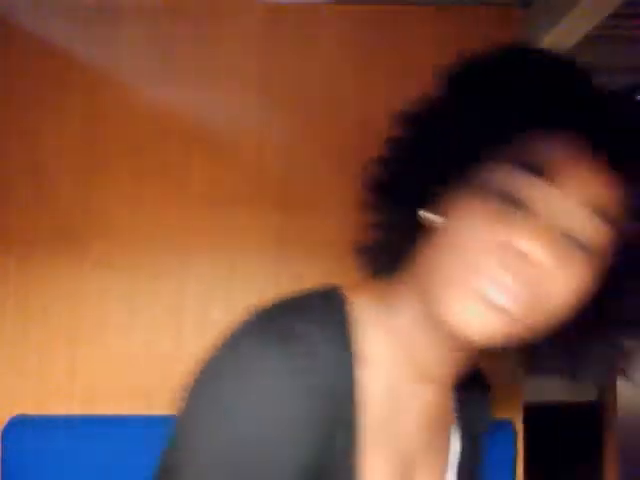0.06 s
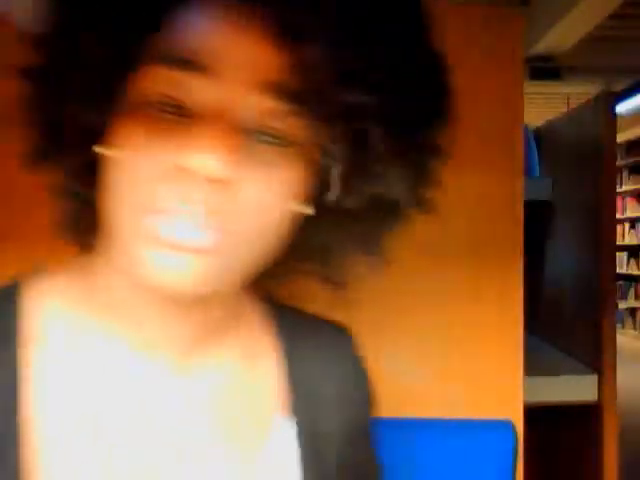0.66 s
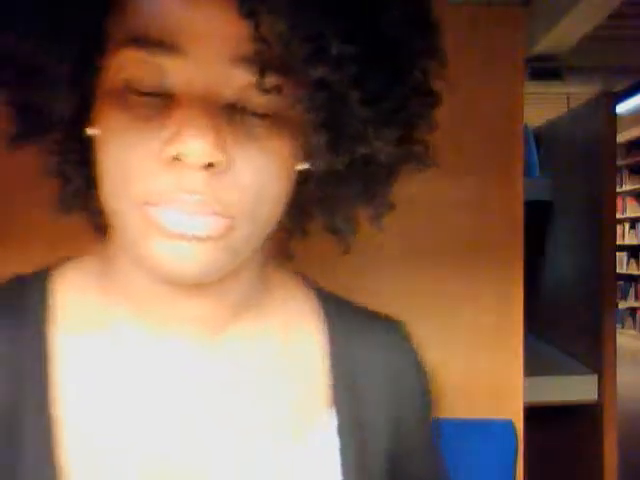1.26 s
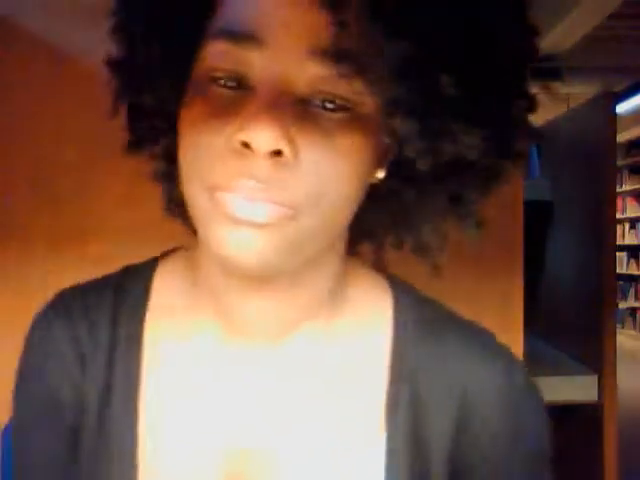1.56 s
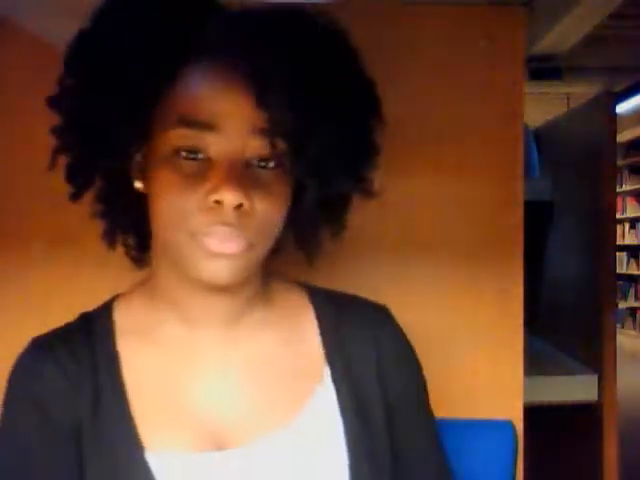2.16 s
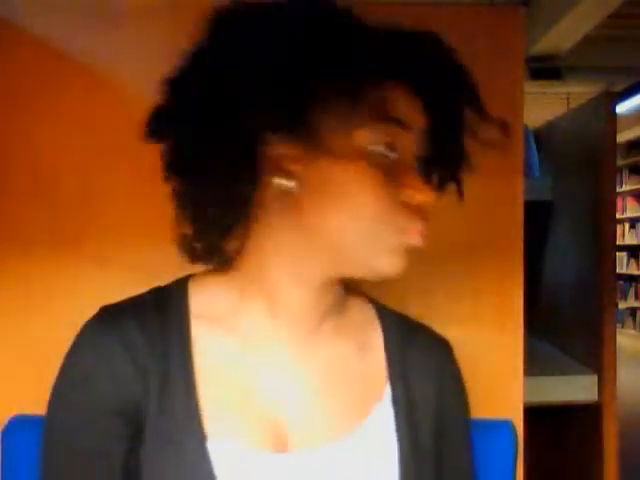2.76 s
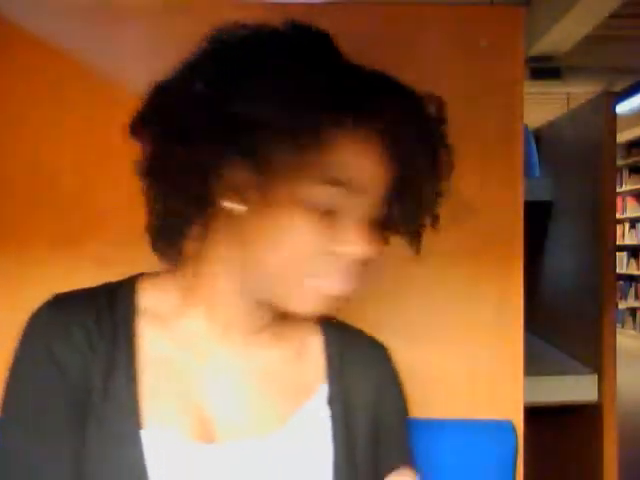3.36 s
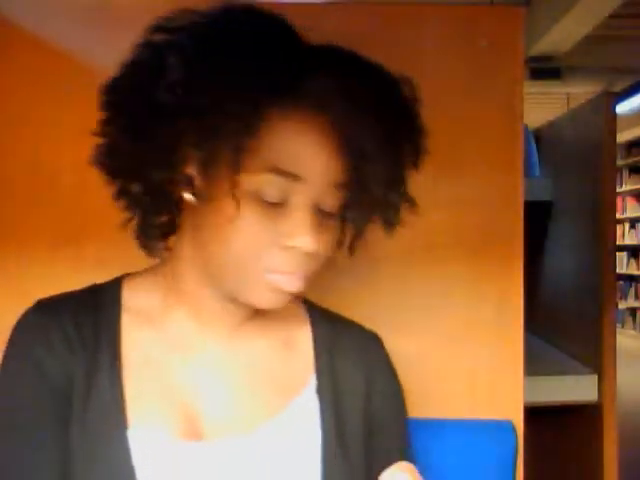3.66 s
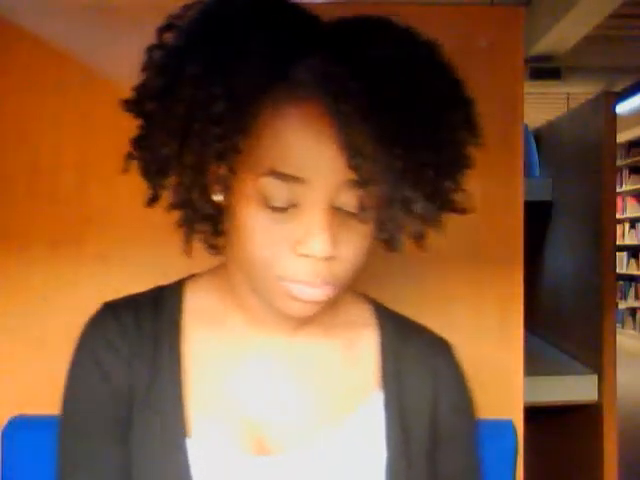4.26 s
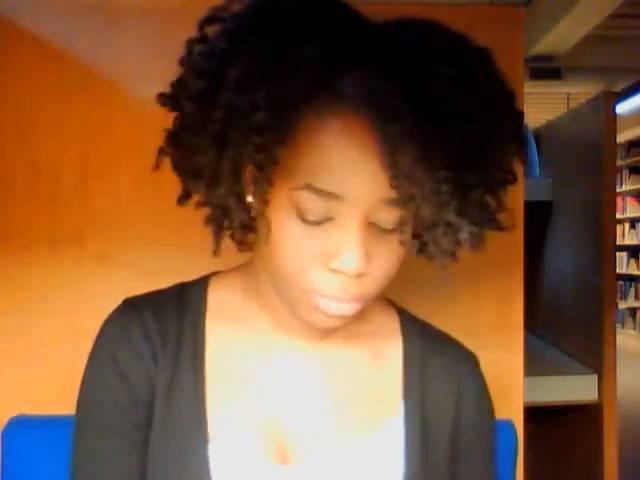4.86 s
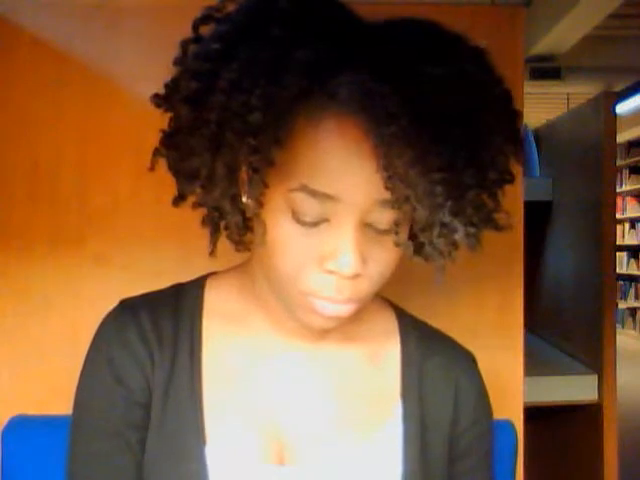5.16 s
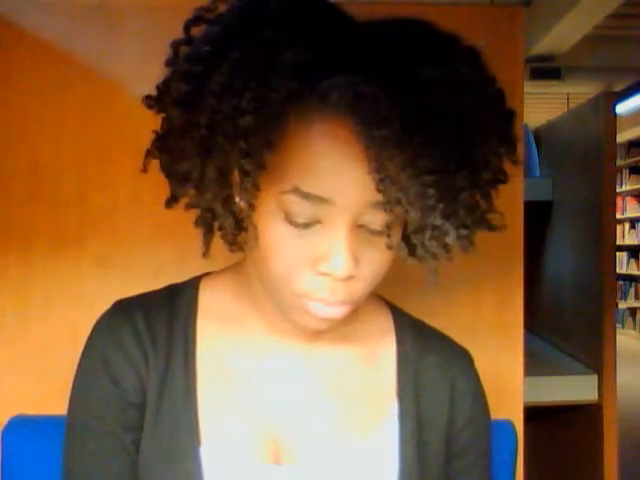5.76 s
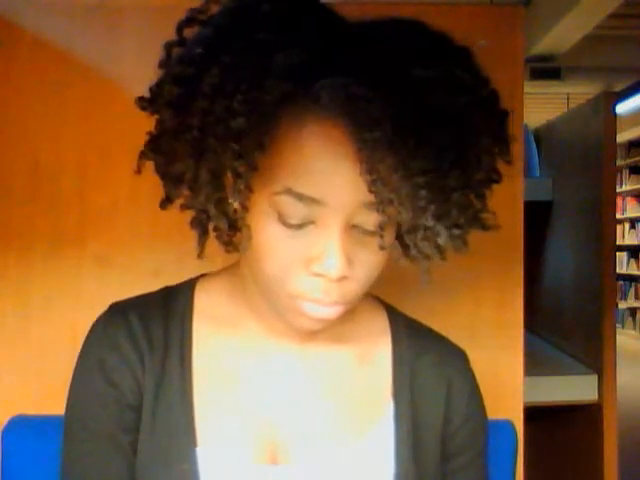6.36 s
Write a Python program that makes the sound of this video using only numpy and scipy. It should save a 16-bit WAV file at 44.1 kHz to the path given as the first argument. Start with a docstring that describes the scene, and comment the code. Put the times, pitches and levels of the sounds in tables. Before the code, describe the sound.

Someone slides into a seat with a low rumble and dragging clothes, arms bumping softly on a wooden desk. Something lands on the desk with a loud knock, followed by thumps and a lighter knock. Sleeves then brush and small things click now and then. A faint ventilation hum and a thin electronic whine fill the quiet room, with the microphone standing on the desk.

```python
"""Arms bump and rub a wooden desk as someone slides into a seat and settles in a quiet room.
Each bump makes the wood ring, and the microphone standing on the desk picks it up. Something is set
down with a hard knock and a lighter one. Cloth catches and slips on the wood, sleeves brush and small
things click. Behind it all are a faint ventilation hum and a thin electronic whine."""
import sys
import numpy as np
from scipy import signal
from scipy.fft import rfft, irfft, next_fast_len
from scipy.io import wavfile
from scipy.ndimage import uniform_filter1d

SR = 44100
rng = np.random.default_rng(int(sys.argv[2]) if len(sys.argv) > 2 else 0)


def int16_out(signal):
    """Quantize to a 16-bit WAV file."""
    q = np.round(np.clip(np.atleast_2d(signal).T, -1, 1) * 32767)
    wavfile.write(sys.argv[1], SR, q.astype(np.int16))


N = 287532
T = np.arange(N) / SR


# Soft bumps: t/s, level/dB, judder f/Hz, fade/s, settling push/dB above the bump
# (a fade, or t60, is the time a sound takes to drop by 60 dB)
ARM_BUMPS = [(0.224, -38.5, 76, 0.056, -6), (0.471, -40.5, 97, 0.11, 0.5),
             (0.599, -22.5, 166.6, 0.076, -14.5), (.603, -30.5, 227, 0.12, -20),
             (.654, -29.5, 186, .13, -21), (0.704, -31, 70.5, 0.12, -20), (0.808, -26.5, 132.7, 0.2, -12),
             (.857, -27.5, 62.9, 0.46, -19), (1.002, -28, 64.8, 0.5, -20), (1.036, -27, 78.3, 0.13, -11),
             (1.161, -36, 73.6, 0.071, -14), (1.381, -40, 58, 0.054, -6), (1.489, -32, 131, .035, -21),
             (1.5058, -8, 87.3, 0.13, -10), (1.509, -16.5, 168.7, 0.22, 0.5),
             (1.517, -15.5, 290, 0.079, -15), (1.658, -20, 213.5, 0.15, 1.5),
             (1.806, -22.5, 173.7, 0.24, 3), (1.912, -29, 69.5, 0.36, -23), (1.991, -29.5, 222, 0.16, -19),
             (2.431, -42.5, 150, 0.077, -11.5), (2.634, -47.5, 125, 0.19, -11), (3.201, -42, 84, 0.12, -15),
             (3.363, -33, 325, 0.062, -22), (3.379, -38, 34.5, 0.15, -27), (3.868, -43, 36.6, 0.18, -25),
             (4.81, -34.5, 70, 0.28, -25.5), (4.844, -40.5, 123.4, 0.21, -8), (4.941, -39, 92, 0.048, -24)]

def arm_bumps(rise_cycles=0.45, ring_db=-7, settle_delay_s=0.023, settle_hz=80, settle_t60=0.089):
    """An arm lands softly and judders, then its weight settles with a deep push; the desk rings along."""
    out, desk = np.zeros(N), desk_tones().sum(0)
    t = T[:len(desk)]

    def bump(hz, t60):
        """One soft push and the ring it leaves, at peak 1."""
        soft_start = 1 - np.exp(-(t * hz / rise_cycles) ** 2)
        push = soft_start * np.sin(2 * np.pi * hz * t) * dying(t, t60, 1 / SR)
        ring = signal.fftconvolve(push, desk)[:len(t)]
        sound = unit(push) + amp(ring_db) * unit(ring)
        sound = keep_side(sound, "high", 0.4 * hz, order=2)  # little lies below the judder
        return sound / abs(sound).max()

    for s, db, hz, t60, settle_db in ARM_BUMPS:
        add(out, s, amp(db) * bump(hz, t60))
        add(out, s + settle_delay_s, amp(db + settle_db) * bump(settle_hz, settle_t60))
    return out


# The natural tones of the desk and what stands on it: f/Hz, level/dB, fade/s
DESK_TONES = [(36.5, -1, 0.17), (64, 4, 0.2), (83, -5.5, .1), (137, 3.5, 0.3), (132, -12, 0.067),
              (169, -7, 0.1), (200, 1.5, 0.018), (210, -1, 0.1), (237, -8, 0.086), (250, -12, 0.15),
              (341, -15.5, 0.13), (469, -0.5, 0.19), (555, -18, 0.049), (609, -21, 0.35), (1087, -32, 0.18),
              (1020, -27, 0.26), (1320, -31, 0.067), (1461, -20.5, 0.26), (1550, -22.5, 0.12),
              (1727, -34.5, 0.19), (1928, -28.5, 0.2), (2087, -39.5, 0.082), (2190, -36.5, 0.17),
              (2450, -32, 0.18)]

def desk_tones(size=22050):
    """A struck desk rings with many fading tones at once; each gets its own row."""
    t = T[:size]
    return np.array([amp(db) * dying(t, t60, 1 / SR) * np.sin(2 * np.pi * hz * t)
                     for hz, db, t60 in DESK_TONES])


def hard_ring(corner_hz=520):
    """A hard, brief touch wakes mostly the desk's higher tones."""
    hz = np.transpose(DESK_TONES)[0]
    strength = hz ** 2 / (hz ** 2 + corner_hz ** 2) * (hz / (hz + corner_hz))
    ring = strength @ desk_tones()
    return ring / abs(ring).max()


# Hard blows: t/s, ring/dB, chatter/dB, chatter fade/s, bright edge/dB
HARD_KNOCKS = [(0.598, -61.5, -50, .07, -52), (.767, -54.5, -44, 0.047, -63.5),
               (1.5088, -17, -21, 0.05, -34), (1.5135, -50, -23, 0.074, -30.5), (1.657, -42, -45, .08, -64),
               (1.98, -27.5, -30, 0.12, -51.5), (1.986, -34, -37, .09, -49.5),
               (3.363, -58.5, -53, 0.054, -77)]
# The tone colour of a hard thing chattering on wood: f/Hz, level/dB
CHATTER_COLOUR = [(120, -9), (300, 5), (560, 5), (780, -5.5), (1030, 0), (1200, -9), (1500, 1),
                  (1950, -5.5), (2500, -11.5), (3300, -22), (8000, -45.5), (12000, -78.5)]

def knocks(rise_s=0.00068, edge_t60=0.039, rattle_db=-19, edge_rattle_db=-15):
    """A hard thing lands: the desk rings while the contact chatters, then a softer rattle dies away."""
    out, ring = np.zeros(N), hard_ring()
    t = T[:len(ring)]
    rattle = dying(t, t60=0.34, rise_s=0.016)
    for s, ring_db, chatter_db, t60, edge_db in HARD_KNOCKS:
        chatter = noise(CHATTER_COLOUR, len(t)) * (dying(t, t60, rise_s) + amp(rattle_db) * rattle)
        edge = noise(HISS_COLOUR, len(t)) * (dying(t, edge_t60, rise_s) + amp(edge_rattle_db) * rattle)
        add(out, s, amp(ring_db) * ring + amp(chatter_db) * chatter + amp(edge_db) * edge)
    return out


# The tone colours of the rumbling desk, its scraped top and hissing cloth: f/Hz, level/dB
RUMBLE_COLOUR = [(15, -38), (28, 5), (60, 3), (125, 3.5), (170, -1.5), (245, -13), (330, -18), (450, -37.5),
                 (900, -86.5)]
SCRAPE_COLOUR = [(150, -25.5), (320, 5.5), (400, -6.5), (470, 0.5), (620, 4), (780, -5.5), (1020, -3),
                 (1250, -9), (1800, -6.5), (2600, -21.5), (4000, -24), (8000, -45), (12000, -79)]
HISS_COLOUR = [(600, -27), (1500, -6), (2400, -5), (3000, -5), (3400, -6), (3900, -3.5), (4800, -2.5),
               (5700, 3.5), (6400, 3), (7200, -10), (8200, -17.5), (10000, -26), (15000, -51)]

def friction(slips_per_s=6000, grain_db=1.5, flutter_db=1.6, ring_db=-2, split_hz=800):
    """Cloth catches and slips on wood, making a rumble, a dull and a bright scrape, and a hiss."""
    slips = rng.standard_normal(N) * amp(grain_db * np.minimum(rng.exponential(1, N), 6))
    slips *= rng.random(N) < slips_per_s / SR
    slips *= amp(flutter_db * drift(90))
    ringing = unit(signal.oaconvolve(slips, hard_ring())[:N])
    scrape = patchy(colour(slips, SCRAPE_COLOUR) + amp(ring_db) * ringing)
    dull = signal.sosfiltfilt(signal.butter(3, split_hz, fs=SR, output="sos"), scrape)
    return noise(RUMBLE_COLOUR), dull, scrape - dull, patchy(colour(slips, HISS_COLOUR))


# The long slide into the seat: t/s, weight/dB, rubbing/dB
SEAT_SLIDE = [(0.57, -50.5, -74.5), (0.596, -41.5, -59), (0.746, -34.5, -63), (0.816, -35, -54.5),
              (0.988, -36, -55), (1.04, -35, -59), (1.102, -32.5, -62), (1.13, -44.5, -67.5),
              (1.18, -46, -97.5), (1.21, -50, -82)]

def seat_slide(rumble, dull, bright, hiss):
    """The body slides into the seat: its weight rumbles while the clothes drag, scrape and swish."""
    s, weight_db, rubbing_db = np.transpose(SEAT_SLIDE)
    weight = amp(np.interp(T, s, weight_db, left=-120, right=-120))
    rubbing = amp(np.interp(T, s, rubbing_db, left=-120, right=-120))
    drag = amp(10) * band(hz=250, width=0.14)
    swish = amp(-8) * band(hz=6030, width=0.12)
    clothes = drag + amp(2) * (dull + bright) + amp(-5) * hiss + swish
    return weight * amp(-2) * rumble + rubbing * clothes


# Shifts of weight on the desk: t/s, hold/s, level/dB
WEIGHT_SHIFTS = [(.01, 0.18, -59.5), (0.235, 0.13, -57.5), (0.463, 0.13, -48.5), (1.555, 0.041, -18.5),
                 (1.67, .32, -31), (2.058, .06, -44), (2.353, 0.4, -55), (3.383, .16, -45.5),
                 (3.874, 0.051, -55.5), (4.831, 0.31, -46.5), (6.183, 0.09, -60.5)]
# Arms rubbing the top: t/s, hold/s, level/dB, tilt from dull to bright/dB
ARM_RUBS = [(0.342, 0.063, -62.5, 5), (0.78, .035, -51, -11), (0.926, 0.014, -51.5, -9),
            (1.242, 0.068, -49.5, 1.5), (1.362, 0.019, -53, -1.5), (1.735, 0.07, -47.5, 3),
            (1.927, .045, -60.5, -6), (2.017, 0.1, -51.5, -0.5), (2.161, .19, -59.5, -2),
            (2.538, 0.029, -49.5, -0.5), (3.281, .012, -67.5, -10.5), (3.382, 0.016, -54, -.5),
            (3.83, 0.048, -62.5, 5.5), (3.89, 0.039, -58.5, 6.5)]

def arm_rubs(rumble, dull, bright, hiss):
    """Shifting weight only rumbles; each rub has its own tilt, from a dull scrape to a bright one."""
    out = np.zeros(N)
    for s, hold, db in WEIGHT_SHIFTS:
        out += amp(db) * stroke(s, hold, swell_s=0.031, sag_db=17, t60=0.44) * rumble
    rumble_and_hiss = amp(-6) * rumble + amp(-16) * hiss
    for s, hold, db, tilt_db in ARM_RUBS:
        rub = amp(-tilt_db) * dull + amp(tilt_db) * bright + rumble_and_hiss
        out += amp(db) * stroke(s, hold, swell_s=0.012, sag_db=0.72, t60=0.13) * rub
    return out


# Brief fuzzy tones: loudest t/s, half length/s, f/Hz, width/share of f, level/dB
FUZZY_TONES = [(1.24, 0.023, 424, 0.57, -45.5), (1.279, 0.027, 1040, 0.18, -51.5),
               (1.564, 0.02, 622, 0.1, -39.5), (1.991, 0.013, 1070, 0.15, -42.5),
               (2.06, 0.072, 2840, .3, -60.5), (6.168, .087, 4770, .043, -81.5)]

def fuzzy_tones(size=32768):
    """Short bands of noise swell and fade, during rubs or just after knocks."""
    out = np.zeros(N)
    t = T[:size] - T[size // 2]
    for s, half_length, hz, width, db in FUZZY_TONES:
        swell = np.exp(-(t / half_length) ** 2)
        add(out, s + t[0], amp(db) * band(hz, width, size) * swell)
    return out


# Small hard things clicking: t/s, level/dB, fade/s, snap f/Hz, body/dB above the snap
SMALL_CLICKS = [(.208, -49, 0.21, 5900, -31), (.671, -59.5, .05, 2320, 3),
                (2.7012, -51.5, 0.056, 6060, -9.5), (3.0006, -39, 0.024, 5850, -6),
                (3.006, -63, .015, 4485, -20), (3.8217, -39.5, 0.014, 5400, -16),
                (4.027, -47, 0.063, 5550, -22), (4.611, -51, 0.15, 6190, -13.5),
                (5.3426, -37.5, .02, 6520, -2), (5.9592, -63, .06, 6410, -20)]
# The tone colour of a click's hollow body: f/Hz, level/dB
BODY_COLOUR = [(600, -68), (1150, -28), (1450, -0.5), (1800, 5.5), (2150, -10), (2700, 5), (3300, -11),
               (3800, 0), (5000, -31), (9000, -22)]

def clicks(tail_db=-19, size=8192):
    """A bright snap with a hollow body; nearby surfaces scatter a short tail."""
    out, t = np.zeros(N), T[:size]
    tail = amp(tail_db) * dying(t, t60=0.15, rise_s=0.0035)
    for s, db, t60, hz, body_db in SMALL_CLICKS:
        snap = noise([(hz / 6, -32), (hz / 2, -11), (hz * 0.8, -5), (hz, 0),
                      (hz * 1.2, -8), (hz * 1.5, -28), (hz * 2.5, -62)], size)
        body = amp(body_db) * noise(BODY_COLOUR, size)
        loudness = dying(t, t60, rise_s=0.00014) + tail
        add(out, s, amp(db) * loudness * (snap + body))
    return out


# Sleeves brushing: t/s, hold/s, level/dB, scrape/dB and top treble/dB (both above the hiss)
SLEEVE_BRUSHES = [(.15, 0.14, -64.5, -2, -22), (0.332, 0.65, -71.5, -4, -14), (1.42, 0.1, -70, -9, -9),
                  (1.56, 0.21, -63.5, -16, -25), (1.744, 0.044, -54, -5.5, -9.5),
                  (2.22, 0.16, -68.5, -9.5, -22), (3.098, 0.037, -54.5, -6, -38),
                  (3.345, 0.074, -60.5, -12, -8.5), (3.477, 0.09, -64, -5, -10.5),
                  (3.78, 0.1, -66.5, -2.5, -10), (4.038, 0.025, -51, -18.5, -17.5),
                  (4.635, 0.049, -60.5, -5, -30), (5.979, 0.0475, -74, -13.5, -14)]

def sleeves(flutter_db=1.0):
    """Cloth brushes on cloth: a hiss with a little scrape and a faint hollow tone."""
    hiss = patchy(noise(HISS_COLOUR))
    hollow = amp(-14) * band(hz=1030, width=0.1)
    scrape = patchy(noise(SCRAPE_COLOUR))
    scrape = unit(keep_side(scrape, "high", hz=1500, order=1))  # a light touch stirs few low sounds
    treble = band(hz=7500, width=1)
    out = np.zeros(N)
    for s, hold, db, scrape_db, treble_db in SLEEVE_BRUSHES:
        cloth = hiss + hollow + amp(scrape_db) * scrape + amp(treble_db) * treble
        out += amp(db) * stroke(s, hold, swell_s=0.013, sag_db=3, t60=0.26) * cloth
    return out * amp(flutter_db * drift(70))


# The tones of the ventilation: f/Hz, level/dB
HUM_TONES = [(120, -82), (318, -78.5), (640, -81.5), (678, -90.5), (1450, -87), (2400, -88.5), (4818, -86)]
# The tone colour of its moving air: f/Hz, level/dB
AIR_COLOUR = [(20, 5), (60, 4), (90, -9.5), (122, 7), (160, -5.5), (260, -17), (318, -4.5), (380, -12.5),
              (630, -15), (800, -18), (2000, -22.5), (3300, -27.5), (6300, -22), (8000, -29),
              (10000, -35.5), (15000, -48.5)]

def ventilation(air_db=-64, waver_db=3.0):
    """Air rushes softly under a hum; its swirling shakes and blurs each tone."""
    hum = np.zeros(N)
    for hz, db in HUM_TONES:
        waver = amp(waver_db * drift(7))
        blur = np.pi / 2 * drift(22 + hz / 30)
        hum += amp(db) * unit(waver * np.sin(2 * np.pi * hz * T + blur))
    return hum + amp(air_db) * noise(AIR_COLOUR)


# How loud the electronic whine is over time: t/s, level/dB
WHINE_LEVELS = [(0, -90), (1.5, -85), (2.5, -86), (4.9, -87.5), (5.3, -81), (6.52, -79)]

def whine(hz=8000, pulses_per_s=6, uneven_db=3.0):
    """Electronics give off one thin, high tone that pulses unevenly."""
    beat = np.sin(2 * np.pi * pulses_per_s * T + 2.0 * drift(9.3))
    pulses = np.clip(beat + 0.21, 0, 1) * amp(uneven_db * drift(35))
    tone = np.sin(2 * np.pi * hz * T + 0.9 * drift(200))
    level_db = np.interp(T, *np.transpose(WHINE_LEVELS))
    return amp(level_db) * unit(pulses * tone)


# Echoes off the desk top and things beside the microphone: delay/ms, gain
CLOSE_ECHOES = [(.9, 0.076), (2.1, -0.15), (3.4, 0.031), (5.3, 0.081)]

def close_echoes(x):
    """Very quick echoes lift some pitches and weaken others; the overall level stays the same."""
    out = x.copy()
    for ms, gain in CLOSE_ECHOES:
        add(out, ms / 1000, gain * x)
    return out * np.std(x) / np.std(out)


# How long the room rings at each pitch: f/Hz, fade/s
ROOM_FADES = [(100, 0.2), (500, 0.51), (2000, 0.34), (6000, 0.1), (12000, 0.3)]

def room(x, echoes_per_s=2500, first_echo_s=0.012, size=26000):
    """The room sends back scattered echoes, each pitch dying at its own speed."""
    echoes = rng.standard_normal(size) * (rng.random(size) < echoes_per_s / SR)
    echoes *= T[:size] > first_echo_s
    hz, t, bands = signal.stft(echoes, SR, nperseg=256)
    fade = amp(-60 * t / read(ROOM_FADES, hz)[:, None])
    tail = signal.istft(bands * fade, SR, nperseg=256)[1]
    return signal.fftconvolve(x, tail / np.linalg.norm(tail))[:N]


def amp(db):
    """Turns decibels into a number to multiply by."""
    return 10 ** (np.asarray(db) / 20)


def unit(x):
    """Scales a sound to an average (rms) level of 1."""
    return x / np.sqrt(np.mean(x ** 2) + 1e-20)


def read(points, hz):
    """Reads between the rows of a table, with octaves evenly spaced."""
    f, value = np.transpose(points)
    return np.interp(np.log(hz + 1), np.log(f + 1), value)


def add(mix, s, sound):
    """Mixes a sound in at s seconds."""
    part = mix[max(round(s * SR), 0):][:len(sound)]
    part += sound[:len(part)]


def keep_side(x, side, hz, order):
    """Keeps the "low" or "high" side of hz; a higher order cuts more sharply."""
    return signal.sosfilt(signal.butter(order, hz, side, fs=SR, output="sos"), x)


def colour(x, points):
    """Gives a sound a tone colour (its balance of low and high), at level 1."""
    size = next_fast_len(len(x))
    gain = amp(read(points, np.fft.rfftfreq(size, 1 / SR)))
    return unit(irfft(rfft(x, size) * gain, size)[:len(x)])


def noise(points, size=N):
    """Noise with a given tone colour."""
    return colour(rng.standard_normal(size), points)


def band(hz, width, size=N):
    """Noise gathered around one pitch."""
    spread = 1 + width
    return noise([(hz / 3, -60), (hz / spread, -20), (hz, 0), (hz * spread, -20), (hz * 3, -65)], size)


def patchy(x, patch_db=2.5):
    """The colour of a rubbing sound shifts from moment to moment as the contact moves."""
    bands = signal.stft(x, nperseg=512, noverlap=384)[2]
    patches = uniform_filter1d(rng.standard_normal(bands.shape), size=4, axis=0)  # smooth over pitch
    patches = unit(uniform_filter1d(patches, size=14, axis=1))  # and over time
    return unit(signal.istft(bands * amp(patch_db * patches), nperseg=512, noverlap=384)[1][:N])


def drift(per_s):
    """Glides between random values, per_s of them a second, at level 1."""
    values = rng.standard_normal(4096)
    return unit(np.interp(T * per_s, np.arange(len(values)), values))


def dying(t, t60, rise_s):
    """A quick rise, then a steady fade."""
    return (1 - np.exp(-t / rise_s)) * amp(-60 * t / t60)


def stroke(start, hold, swell_s, sag_db, t60):
    """The loudness of one movement: it swells, sags while it is held, then dies away."""
    t = T - start
    swell = np.exp(-np.minimum((np.minimum(t, 0) / swell_s) ** 2, 50))
    drop_db = sag_db * np.clip(t / hold, 0, 1) + 60 * np.clip((t - hold) / t60, 0, 3)
    return swell * amp(-drop_db)


def scene():
    """Bumps reach the microphone through the desk, other movements through the air; both echo."""
    contact = friction()
    bumps = arm_bumps()
    airborne = knocks() + clicks() + seat_slide(*contact) + arm_rubs(*contact) + sleeves()
    airborne = close_echoes(airborne) + fuzzy_tones()
    # sound arriving from the side of the microphone loses its highest treble
    airborne = keep_side(airborne, "low", hz=9500, order=3)
    echoes = room(amp(-13.5) * airborne + amp(-16.0) * bumps)
    return (bumps + airborne + echoes + ventilation() + whine())[None]


def record(dry):
    """The microphone loses the deepest bass and the top of the treble."""
    thin = keep_side(dry, "high", hz=20, order=2)
    treble_cut = signal.firwin(255, cutoff=15000, window=("kaiser", 9), fs=SR)
    return signal.oaconvolve(thin, treble_cut[None], "same")


dry = scene()
out = record(dry)
int16_out(out)
```